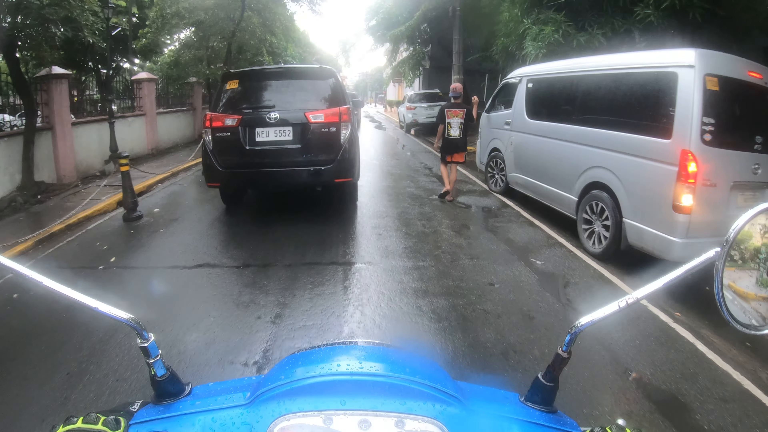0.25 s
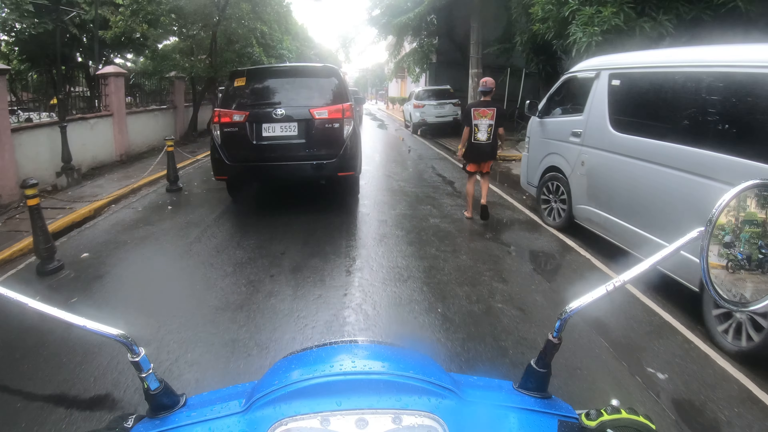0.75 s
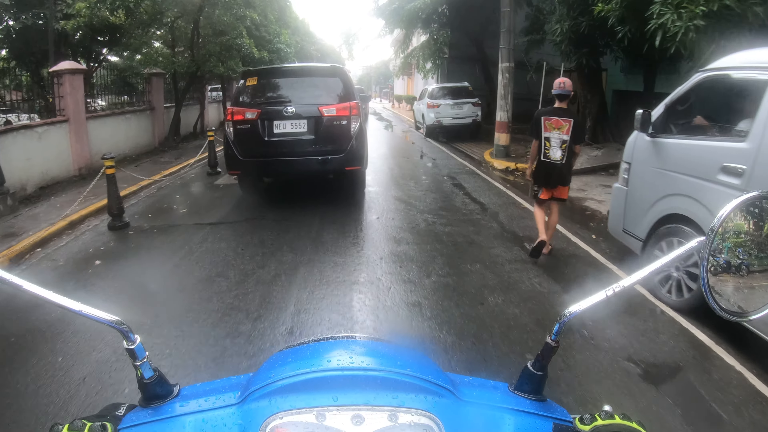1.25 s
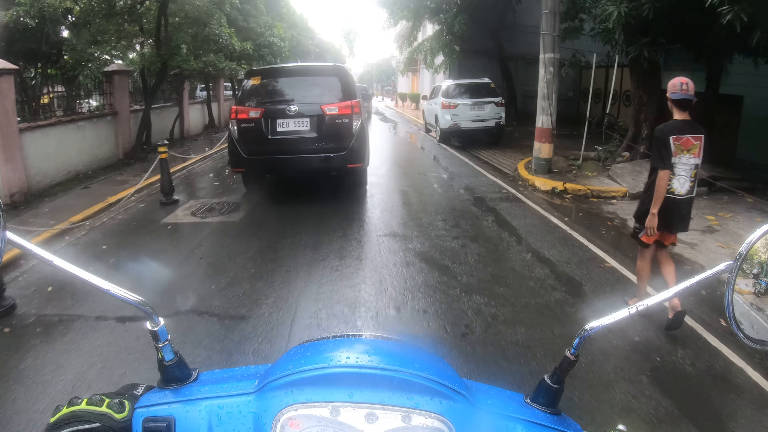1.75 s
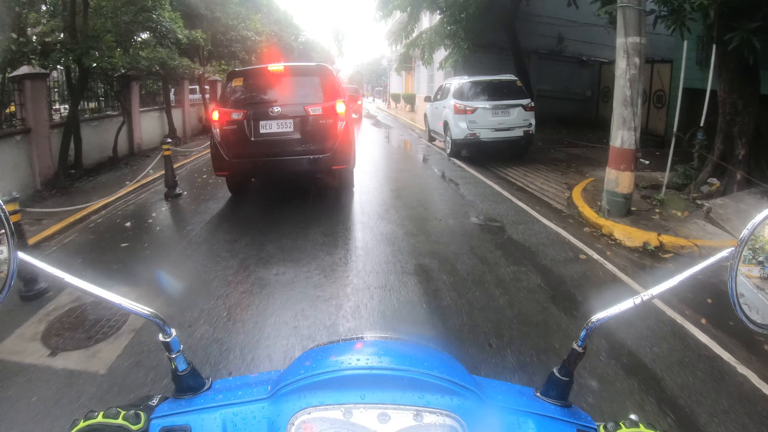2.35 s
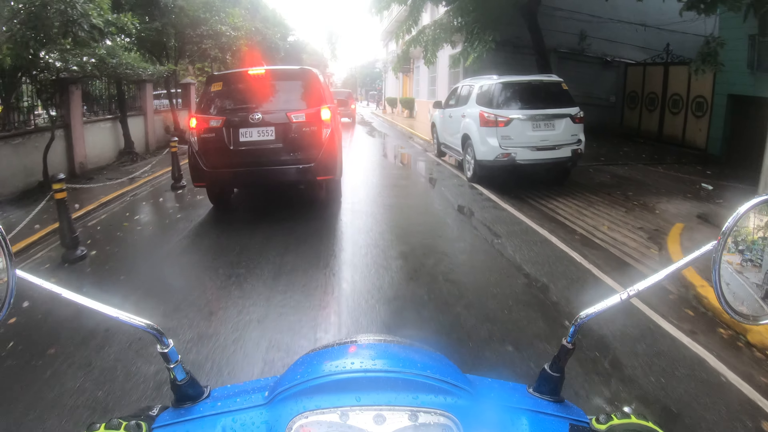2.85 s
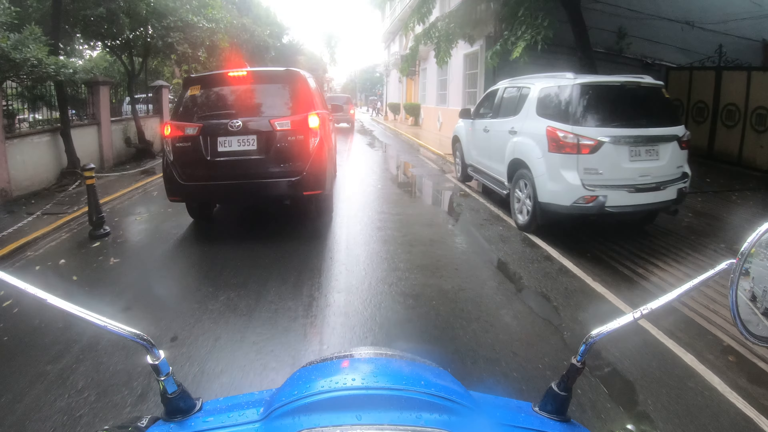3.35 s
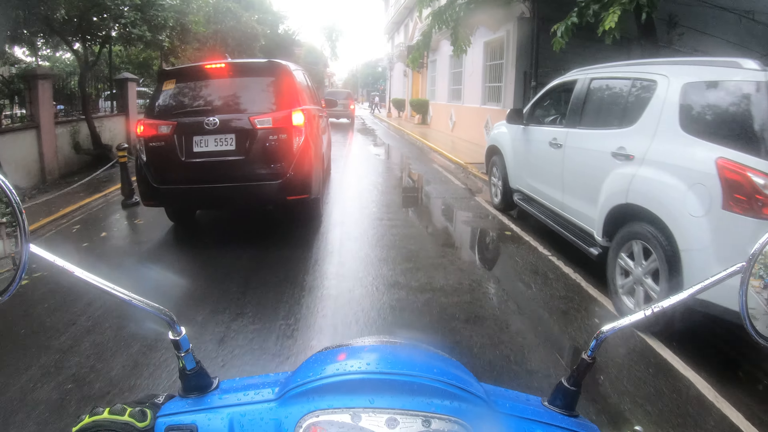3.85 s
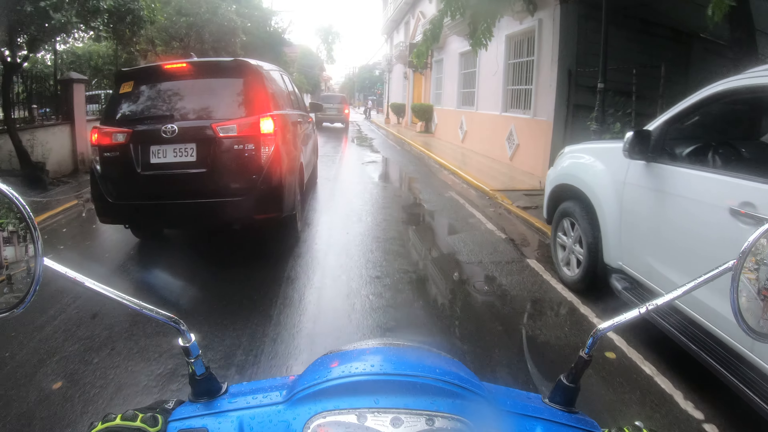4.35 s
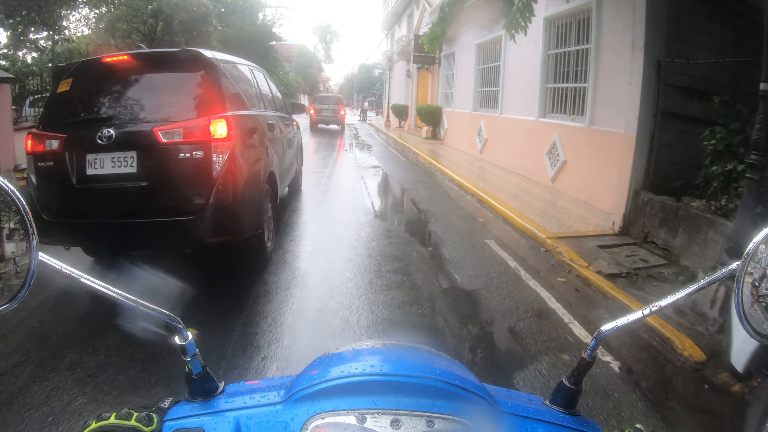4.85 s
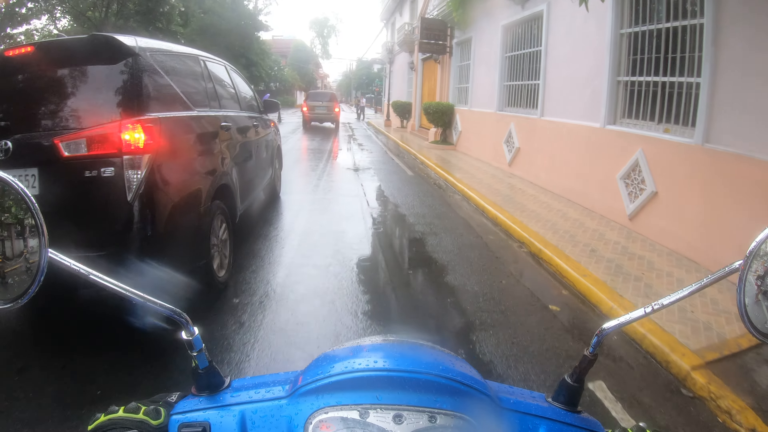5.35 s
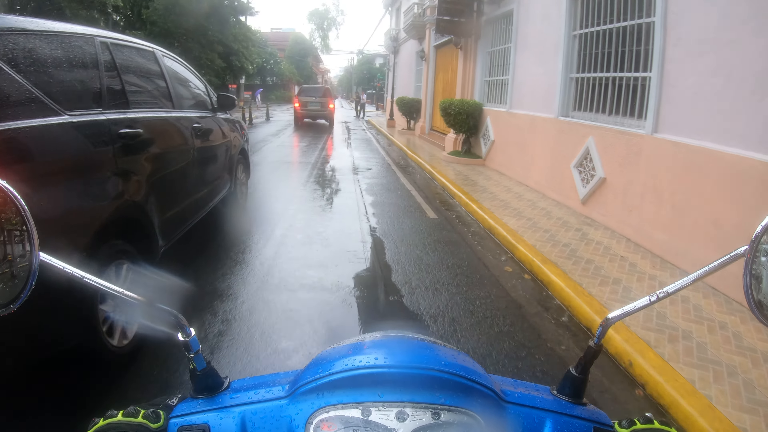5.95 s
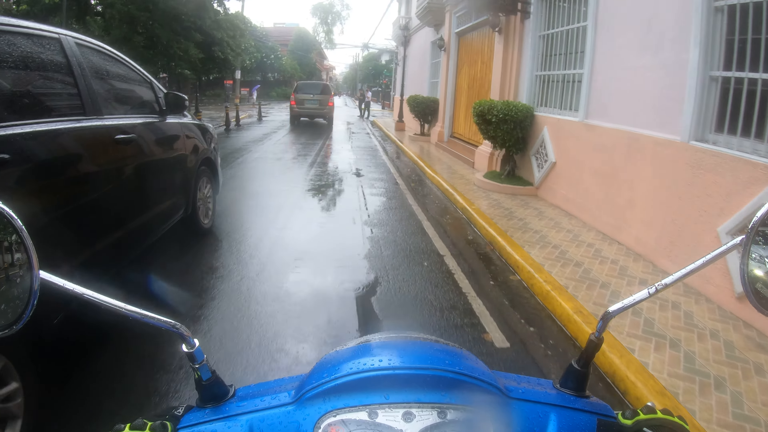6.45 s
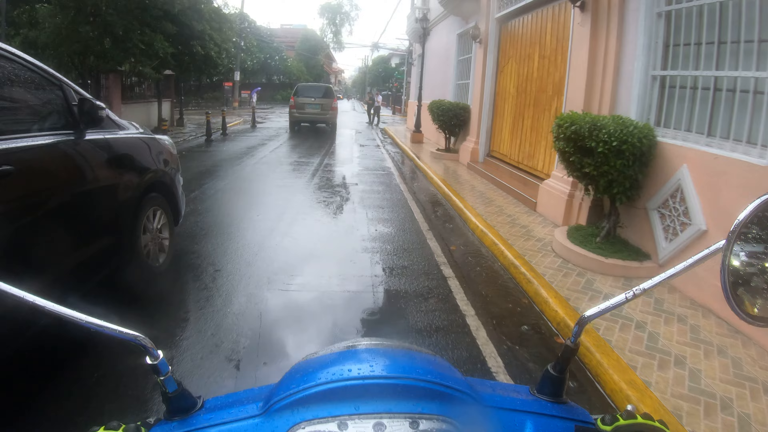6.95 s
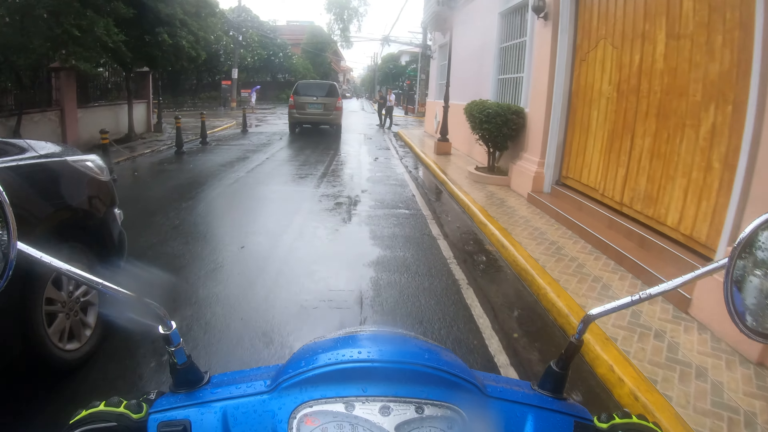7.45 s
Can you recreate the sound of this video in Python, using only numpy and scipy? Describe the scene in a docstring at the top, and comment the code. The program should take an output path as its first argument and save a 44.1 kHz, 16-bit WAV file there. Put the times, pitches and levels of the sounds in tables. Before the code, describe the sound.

A scooter rides along a wet street, heard from a microphone mounted on it. For the first half second the engine shakes the frame with a low shudder, then settles into a quiet whir with light clatter and faint, wavering whines. Tyres rumble and fling off a fine hiss of water throughout, over low wind and a deep rocking rumble. Loose panels rattle briefly four times between 0.4 and 1.7 seconds, with one soft bump at about 1 second. At 4.7 seconds comes a sharp knock, and a lighter one at 5.4. From 5.6 seconds to the end, loud bumps follow about three times a second, each a dull blow with a clack, rebound and thud. Wind gusts buffet the microphone from about 5.9 seconds, strongest after 7. Grit ticks at 6.5 seconds, the engine works slightly harder, and puddles swish by around 6.7 and 7.5 seconds.

```python
"""Scooter on a wet street

Heard from a camera mounted on the scooter: tyres rumble, roar and spray, and wind buffets the microphone.
The engine shakes the frame as it pulls away, then whirs, clatters and whines faintly. Dips rock the frame
and loose panels rattle. After one soft bump comes a row of them, each knocking the mount, which clacks,
rebounds and thuds. Grit ticks on the bodywork, and puddles swish by near the end."""
import sys
import numpy as np
from scipy import signal
from scipy.fft import rfft, irfft
from scipy.io import wavfile
from scipy.ndimage import uniform_filter1d

SR = 44100
rng = np.random.default_rng(int(sys.argv[2]) if len(sys.argv) > 2 else 0)


def wrap_up_sound(samples):
    """Save the sound to the file named by the first command line argument, as 16-bit audio."""
    columns = np.atleast_2d(samples).T
    # keep every value between -1 and 1, then stretch to whole-number steps
    tamed = np.clip(columns, -1, 1)
    steps = np.round(tamed * 32767).astype(np.int16)
    wavfile.write(sys.argv[1], SR, steps)


N = 339570
TIME = np.arange(N) / SR


def gain_of(db):
    """Decibels to amplitude."""
    return 10 ** (np.asarray(db) / 20)


def unit_rms(x):
    """Scales to an rms of one."""
    return x / np.sqrt(np.mean(x ** 2) + 1e-20)


def at_hz(rows, hz, column=1):
    """One column of a spectrum table, read on a log-frequency axis."""
    table = np.transpose(rows)
    return np.interp(np.log(hz + 1), np.log(table[0] + 1), table[column])


def automation(rows, column=1):
    """One column of a time table, at every sample."""
    table = np.transpose(rows)
    return np.interp(TIME, table[0], table[column])


def swells(rows):
    """Gain envelope of events that rise and fall smoothly."""
    return sum(gain_of(db) * np.cos(np.pi * np.clip((TIME - middle) / length, -.5, .5)) ** 2
               for middle, length, db in rows)


def wander(rate_hz):
    """Smooth random modulation with an rms of one."""
    hz = np.fft.rfftfreq(N, 1 / SR)
    return unit_rms(irfft(rfft(rng.standard_normal(N)) * np.exp(-(hz / rate_hz) ** 2), N))


def pan(left_db):
    """Stereo gains that put the left side left_db above the right."""
    return gain_of([[left_db / 2], [-left_db / 2]])


def add(mix, start_s, sound):
    """Mixes a stereo sound in at start_s."""
    part = mix[:, max(round(start_s * SR), 0):][:, :sound.shape[1]]
    part += sound[:, :part.shape[1]]


def filtered(x, hz, kind):
    """Second-order low-pass or high-pass."""
    return signal.sosfilt(signal.butter(2, hz, kind, fs=SR, output="sos"), x)


def low_noise(spectrum):
    """Deep coloured noise: the real part is the pressure, the magnitude its envelope."""
    hz = np.fft.rfftfreq(N, 1 / SR)
    coloured = irfft(rfft(rng.standard_normal(N)) * gain_of(at_hz(spectrum, hz)), N)
    return signal.hilbert(unit_rms(coloured))


# stereo image of the two microphone ports:
# (frequency [Hz], coherence [0-1], left phase lead [rad], left over right [dB])
MIC_PORTS = [(60, 0.78, 0.0, -1.3), (170, 0.45, 2.1, 2.1), (270, 0.58, 3.0, -1.4), (460, 0.72, -0.1, -5.1),
             (740, 0.96, -2.8, -2.0), (1000, 0.96, -3.6, -1.5), (1550, 0.81, -4.9, -2.3),
             (2150, 0.89, -5.1, -4.5), (3200, 0.59, -4.5, -1.5), (4900, 0.75, -3.5, -9.7),
             (6700, 0.44, -3.3, -11.0), (10000, 0.22, -6.3, -11.0)]
def airborne(spectrum, patchy_db, panels=(), ripple_db=0):
    """Noise with drifting patches of colour and optional resonances, as the two ports pick it up."""
    size, hop = 2048, 512
    hz = np.fft.rfftfreq(size, 1 / SR)
    a, b, c, d, patches = rng.standard_normal((N // hop + 5, len(hz), 5)).transpose(2, 0, 1)
    left, unrelated = a + 1j * b, c + 1j * d
    coherence, lead, left_db = (at_hz(MIC_PORTS, hz, column) for column in (1, 2, 3))
    right = (coherence * left + np.sqrt(1 - coherence ** 2) * unrelated) * np.exp(-1j * lead)
    patches = unit_rms(uniform_filter1d(uniform_filter1d(patches, size=14, axis=0), size=7, axis=1))
    ripple = unit_rms(uniform_filter1d(rng.standard_normal(len(hz)), size=3))  # weak, narrow resonances
    ring_db = sum(db / (1 + (2 * (hz - centre) / width) ** 2) for centre, width, db in panels)
    colour_db = at_hz(spectrum, hz) + ripple_db * ripple + ring_db + patchy_db * patches
    frames = np.array([left, right]) * pan(left_db) * gain_of(colour_db)
    return unit_rms(signal.istft(frames.swapaxes(1, 2), nperseg=size, noverlap=size - hop)[1][:, :N])


# how hard the drive works: (time [s], relative level [dB])
DRIVE_EFFORT = [(0.0, -53), (0.73, -54), (1.31, -52), (3.11, -50.5), (3.86, -54), (4.33, -52.5),
                (5.96, -52.5), (6.48, -48), (7.06, -50), (7.7, -46.5)]
def effort_db(cruise_db=-52.5):
    """Decibels by which the drive works harder than at an easy cruise."""
    return automation(DRIVE_EFFORT) - cruise_db


# body panels kept ringing by drive and road: (frequency [Hz], width [Hz], boost [dB])
BODY_PANELS = [(312, 35, 9), (496, 15, 1.5), (780, 22, -3), (1417, 78, 8), (1620, 43, 2.5), (1986, 75, 1.5),
               (2108, 50, 1), (2207, 200, 2.5), (2616, 97, 3.5), (3120, 36, 2)]
# tone of the whir: (frequency [Hz], level [dB])
WHIR_EQ = [(600, -35), (1100, -16), (1220, -1.5), (1300, -21), (1480, -1.5), (1750, -1), (2200, -2.1),
           (2480, -5.5), (2740, -5.5), (2860, -8), (3700, -12), (5000, -14), (10000, -89)]
def drive_whir():
    """The drive whirs through the body panels, louder as it works harder."""
    whir = airborne(WHIR_EQ, patchy_db=1.75, panels=BODY_PANELS, ripple_db=0.46)
    return whir * gain_of(automation(DRIVE_EFFORT) + 5 + wander(160))


# tone of each tyre layer: (frequency [Hz], level [dB])
RUMBLE_EQ = [(30, -13), (60, 1), (90, 5), (120, -2.5), (145, -2.5), (190, -2.5), (250, -25.5), (400, -23),
             (1000, -77)]
ROAR_EQ = [(100, -13.5), (220, -3), (270, -11.5), (390, -9), (490, -4.5), (640, -7.5), (770, 2),
           (1100, -2.5), (1320, -16), (1800, -7.5), (4000, -52)]
SPRAY_EQ = [(1500, -3.5), (3000, 2), (3900, -4), (4500, 3), (5100, -3), (5700, -4), (6700, -6),
            (7500, -11.5), (8500, -10.5), (10200, -15.5), (11500, -26), (14000, -34), (16000, -54)]
# coarse asphalt rides the rumble, water rides the spray: (time [s], relative level [dB])
ROAD_COARSENESS = [(0.0, -55), (0.64, -69.5), (2.34, -61.5), (2.59, -54.5), (2.92, -62.5), (3.34, -52),
                   (3.9, -59), (4.45, -56.5), (4.85, -51.5), (5.25, -52), (5.62, -50), (6.26, -51),
                   (7.7, -52)]
ROAD_WETNESS = [(0.0, -63), (0.62, -61.5), (1.48, -57), (3.13, -58), (3.32, -59), (3.92, -60.5), (4.8, -55),
                (5.04, -58.5), (5.77, -57.5), (6.41, -54), (7.1, -54), (7.33, -50), (7.7, -54.5)]
def tyres(cruise_roar_db=-50, max_roar_db=-48.5):
    """Tread rumbles on the asphalt, roars with the drive's effort and flings off a fizz of water."""
    rumble = airborne(RUMBLE_EQ, patchy_db=2)
    rumble *= gain_of(automation(ROAD_COARSENESS) + 6 + 1.5 * wander(10.5))
    roar = airborne(ROAR_EQ, patchy_db=2, panels=BODY_PANELS)
    roar *= gain_of(np.minimum(cruise_roar_db + effort_db(), max_roar_db))
    spray = airborne(SPRAY_EQ, patchy_db=2, ripple_db=1.8)
    spray *= gain_of(automation(ROAD_WETNESS) + 6 + wander(180))
    return rumble + roar + spray


# tone of the wind on the camera: (frequency [Hz], level [dB])
WIND_EQ = [(4, -21), (10, -6.5), (18, -9), (26, -2.5), (33, -8.5), (42, -11), (55, -26.5), (100, -54),
           (300, -84)]
# gusts: (peak time [s], length [s], level [dB])
WIND_GUSTS = [(5.9, 0.36, -36.5), (6.72, 0.21, -37), (7.05, 0.38, -32), (7.26, 0.13, -28.5),
              (7.48, 0.72, -33.5)]
def wind(width=0.43, breeze_db=-45.5, lumps_db=1, lumps_hz=5.5):
    """A lumpy headwind and a few gusts buffet the camera, nearly alike in both ports."""
    centre, left, right = (low_noise(WIND_EQ).real for _ in range(3))
    buffet = unit_rms(centre + width * np.array([left, right]))
    strength = (gain_of(breeze_db) + swells(WIND_GUSTS)) * gain_of(lumps_db * wander(lumps_hz))
    return buffet * pan(-0.78) * strength


def frame_shudder(firing_phase, level_db=-31, grip_s=0.4, settle_db_per_s=113):
    """The engine shakes the frame until the clutch grips."""
    envelope = gain_of(level_db - settle_db_per_s * np.maximum(TIME - grip_s, 0))
    return unit_rms(np.sin(firing_phase)) * envelope * pan(-3)


FIRING_HZ = 29.47
def mount_hum(firing_phase, harmonic=5, level_db=-57.5, fade_db_per_s=5):
    """One harmonic of the engine's firing hums in the mount and slowly fades."""
    phase = harmonic * firing_phase
    lead = at_hz(MIC_PORTS, harmonic * FIRING_HZ, column=2)
    return unit_rms(np.sin([phase, phase - lead])) * gain_of(level_db - fade_db_per_s * TIME)


# modes of the engine cover: (frequency [Hz], level [dB], 60 dB decay [s])
COVER_MODES = [(1940, -3, 0.049), (2099, 2.5, 0.052), (2706, -4, 0.045), (3016, -10.5, 0.044)]
def valve_clatter(firing_phase, taps_per_firing=3, uneven_db=4, attack_s=0.00033, cruise_db=-52):
    """The valve gear taps in step with the firing and rings the engine cover, louder with effort."""
    tap_count = np.floor(taps_per_firing * firing_phase / (2 * np.pi))
    taps = np.diff(tap_count, prepend=0) * gain_of(uneven_db * rng.standard_normal(N))
    t = TIME[:SR // 10]
    hz, db, t60 = np.transpose(COVER_MODES)[..., None]
    phase = 2 * np.pi * hz * t
    envelope = gain_of(db) * (1 - np.exp(-(t / attack_s) ** 2)) * np.exp(-np.log(1000) * t / t60)
    cover = np.sum(envelope * np.sin([phase, phase - at_hz(MIC_PORTS, hz, column=2)]), axis=1)
    ringing = signal.oaconvolve(taps[None], cover, axes=1)[:, :N] * pan(-7.5)
    return unit_rms(ringing) * gain_of(cruise_db + 0.78 * effort_db())


# two faint drive whines gliding together about a fifth apart, plus a brief third whine near 3 s:
# (time [s], pitch [Hz], relative level [dB])
GEAR_TONE = [(.5, 751, -62), (1.5, 822, -64), (1.85, 830, -62), (2.1, 843, -52), (2.35, 860, -57.5),
             (2.95, 870, -73), (3.38, 820, -69), (3.75, 768, -62.5), (5.05, 793, -63.5), (5.7, 824, -59.5),
             (6.35, 822, -60), (7.0, 807, -64), (7.7, 822, -57.5)]
BELT_TONE = [(.9, 1140, -82), (1.5, 1205, -56), (2.2, 1272, -84), (2.7, 1320, -76), (4.1, 1155, -65),
             (4.65, 1166, -61), (4.9, 1186, -67.5), (5.35, 1210, -55.5), (5.6, 1220, -65), (6.0, 1238, -65),
             (6.8, 1192, -69.5)]
CLUTCH_TONE = [(2.2, 1150, -90), (2.7, 1195, -69), (3.1, 1220, -52), (3.35, 1204, -66), (3.7, 1194, -90)]
def whine(rows, waver, trim_db, flutter_db=5, lead_rad=-2.63):
    """A thin drive tone that wavers, fades in and out, and reaches the two ports out of step."""
    hz = automation(rows) * (1 + waver * wander(31))
    phase = 2 * np.pi * np.cumsum(hz) / SR
    level_db = automation(rows, column=2) + trim_db + flutter_db * wander(8.1)
    return np.cos([phase, phase - lead_rad]) * gain_of(level_db)


# tone of the rocking frame: (frequency [Hz], level [dB])
SWAY_EQ = [(14, -32), (21, -8.5), (26, -0.5), (31, -9), (45, -21), (90, -79)]
# sway from dips in the road: (peak time [s], length [s], level [dB])
ROAD_DIPS = [(.56, 0.34, -39.5), (.97, 0.74, -46), (1.53, 0.28, -43), (1.76, 0.62, -43.5),
             (2.24, 0.42, -42.5), (3.6, 0.17, -38.5), (3.85, .2, -42), (4.3, 0.7, -43.5), (4.72, .3, -44)]
def frame_sway(knee=0.34):
    """The frame rocks at each dip in the road; the dampers even out its swing."""
    swing = low_noise(SWAY_EQ)
    damped = swing.real / np.hypot(abs(swing), knee)
    return unit_rms(damped) * swells(ROAD_DIPS) * pan(-1.3)


# light bodywork rattles: (time [s], peak level [dB])
RATTLE_HITS = [(0.4225, -37), (0.545, -38), (1.131, -30.5), (1.634, -35)]
def rattles(centre_hz=2270, edge_ratio=1.165, snap_s=0.001, tail_db=-15, tail_s=0.055):
    """Loose bodywork snaps, then settles in a short dry buzz."""
    out = np.zeros((2, N))
    t = TIME[:SR // 12]
    panel = signal.butter(3, [centre_hz / edge_ratio, centre_hz * edge_ratio], "band", fs=SR, output="sos")
    envelope = np.exp(-t / snap_s) + gain_of(tail_db) * np.exp(-t / tail_s)
    for start, db in RATTLE_HITS:
        buzz = signal.sosfilt(panel, rng.standard_normal(len(t)) * envelope)
        add(out, start, gain_of(db) * pan(-8) * buzz / abs(buzz).max())
    return out


# modes of the mount and plastic bodywork:
# (frequency [Hz], level [dB], 60 dB decay [s], left phase lead [rad])
MOUNT_MODES = [(94.2, -9.5, 0.16, 0.53), (143.4, 1.5, 0.09, 1.96), (195, -20, 0.04, 2.9),
               (257, -4.5, 0.054, 2.69), (337.5, -3, 0.052, 2.4), (411, -6, 0.054, 5.1),
               (540, -14, 0.048, 4.66), (620, -8, 0.056, 3.64), (660, -1, 0.028, 3.62),
               (742, 1.5, 0.05, 3.79), (950, -20, 0.075, 4.2), (995, 1, 0.045, 3.4), (1091, 2, 0.042, 2.58),
               (1414, -6, 0.052, 2.7), (1517, -5, 0.061, 2.06), (1624, -2, 0.029, 1),
               (1856, 0, 0.028, 0.49), (1940, -4, 0.037, 0.83), (2180, -4.5, 0.028, 1.36),
               (2320, -9.5, 0.022, 1.15), (2840, -13, 0.012, 0.35), (4450, -16, 0.011, 1.7)]
def mount_hit(cutoff_hz, kind, left_db, detune_spread=0.012, level_spread_db=3.8):
    """A soft contact ("low") rings the low modes, a hard one ("high") the high; no two land alike."""
    t = TIME[:SR // 6]
    hz, db, t60, lead = np.transpose(MOUNT_MODES)[..., None]
    detune, strength = rng.standard_normal((2, len(MOUNT_MODES), 1))
    phase = 2 * np.pi * hz * (1 + detune_spread * detune) * t
    attack = 1 - np.exp(-3 * hz * t)  # each mode needs part of a cycle to get going
    envelope = gain_of(db + level_spread_db * strength) * attack * np.exp(-np.log(1000) * t / t60)
    ring = np.sum(envelope * np.sin([phase, phase - lead]), axis=1) * pan(left_db)
    hit = filtered(ring, cutoff_hz, kind)
    return hit / abs(hit).max()


def clack(cutoff_hz=1400, damping_s=0.0077):
    """A hard contact that stays pressed and so chokes its own ring."""
    hit = filtered(mount_hit(cutoff_hz, "high", left_db=-6), cutoff_hz, "high")
    return hit * np.exp(-TIME[:hit.shape[1]] / damping_s)


def snap(decay_s, low_hz, high_hz):
    """A tiny bright burst of noise, leaning right."""
    t = TIME[:SR // 50]
    burst = filtered(rng.standard_normal((2, len(t))) * np.exp(-t / decay_s), low_hz, "high")
    burst = filtered(filtered(burst, high_hz, "low"), high_hz, "low")
    return burst / abs(burst).max() * pan(-2.9)


# bumps in the road, levels relative within each column:
# (time [s], blow level [dB], blow cutoff [Hz], clack level [dB], clack delay [s], snap level [dB],
#  rebound level [dB], rebound delay [s], thud level [dB], thud cutoff [Hz], thud delay [s])
ROAD_BUMPS = [(1.051, -38, 220, -56, .002, -60, -48, .011, -33.5, 230, 0.0085),
              (4.7477, -19, 1500, -20, 0.00159, -40, -25, 0.013, -19, 100, 0.0164),
              (5.383, -32, 900, -33, .002, -47, -40, .0058, -50, 210, .01),
              (5.5725, -13.5, 1000, -25.5, 0.0034, -34.5, -18, .012, -15, 130, 0.017),
              (5.945, -11, 660, -24.5, .0026, -27, -20.5, .016, -21.5, 200, 0.018),
              (6.2738, -15.5, 603, -22, .0022, -26.5, -22, .014, -17.5, 170, .018),
              (6.6822, -16, 800, -13, .0006, -27, -27, .0059, -29.5, 150, 0.0063),
              (7.002, -12.5, 696, -24.5, 0.0042, -32, -21, .020, -16, 280, .019),
              (7.314, -15, 680, -29, .003, -30, -25, .018, -16.5, 220, 0.021),
              (7.687, -17, 800, -23, .0018, -31, -24, .017, -26, 210, .021)]
def bumps(rebound_hz=450):
    """Each bump: a dull blow, a clack and snap as the slack runs out, a rebound, a thud coming down."""
    out = np.zeros((2, N))
    for (start, blow_db, blow_hz, clack_db, clack_delay, snap_db,
         rebound_db, rebound_delay, thud_db, thud_hz, thud_delay) in ROAD_BUMPS:
        add(out, start, gain_of(blow_db + 2.5) * mount_hit(blow_hz, "low", left_db=-0.13))
        add(out, start + clack_delay, gain_of(clack_db + 6) * clack())
        add(out, start + clack_delay, gain_of(snap_db) * snap(decay_s=0.0015, low_hz=5240, high_hz=8350))
        add(out, start + rebound_delay, gain_of(rebound_db) * mount_hit(rebound_hz, "high", left_db=-3.5))
        # the drop pushes the mount the opposite way to the blow
        add(out, start + thud_delay, -gain_of(thud_db) * mount_hit(thud_hz, "low", left_db=0.4))
    return out


# flicks of grit and water: (time [s], relative level [dB])
GRIT_HITS = [(3.688, -48), (6.4734, -30.5), (7.295, -52)]
def grit():
    """Grit and drops tick against the scooter."""
    out = np.zeros((2, N))
    for start, db in GRIT_HITS:
        add(out, start, gain_of(db + 5.5) * snap(decay_s=0.00041, low_hz=6600, high_hz=9700))
    return out


# tone of the swish: (frequency [Hz], level [dB])
SWISH_EQ = [(1000, -46), (1700, 3), (2200, 17), (2700, 9), (3200, -32), (6000, -2.5), (12000, -52)]
# passes through puddles: (peak time [s], length [s], level [dB])
PUDDLE_PASSES = [(6.72, 0.69, -45.5), (7.2, 0.085, -43), (7.47, 0.46, -40.5)]
def puddles():
    """The tyres swish through standing water."""
    return airborne(SWISH_EQ, patchy_db=4) * swells(PUDDLE_PASSES) * gain_of(0.52 * wander(60))


def scene():
    """The full mix at the camera; one wavering firing rate drives shudder, hum and clatter."""
    bed = drive_whir() + tyres() + wind()
    firing_phase = 2 * np.pi * np.cumsum(FIRING_HZ * (1 + 0.027 * wander(7.6))) / SR
    engine = frame_shudder(firing_phase) + mount_hum(firing_phase) + valve_clatter(firing_phase)
    whines = (whine(GEAR_TONE, waver=0.0039, trim_db=1.2)
              + whine(BELT_TONE, waver=0.0046, trim_db=8.4)
              + whine(CLUTCH_TONE, waver=0.0036, trim_db=5))
    return bed + engine + whines + frame_sway() + rattles() + bumps() + grit() + puddles()


def record(dry, cutoff_hz=15100):
    """A steep low-pass takes off the very top."""
    lowpass = signal.firwin(511, cutoff_hz, window=("kaiser", 9), fs=SR)
    return signal.oaconvolve(dry, lowpass[None], "same")


dry = scene()
out = record(dry)
wrap_up_sound(out)
```